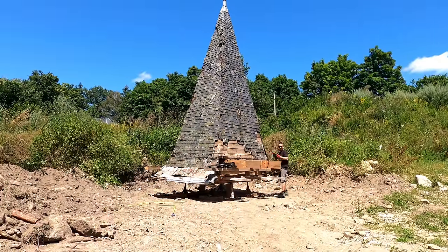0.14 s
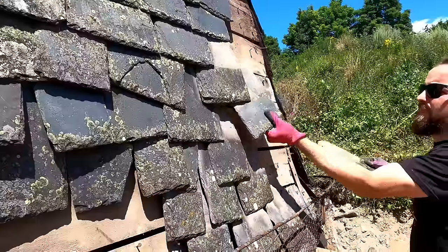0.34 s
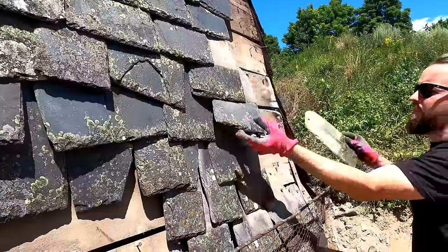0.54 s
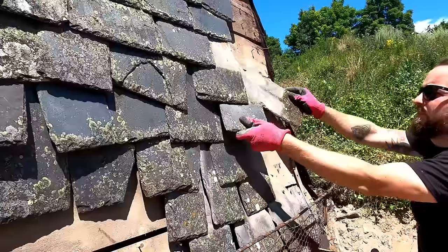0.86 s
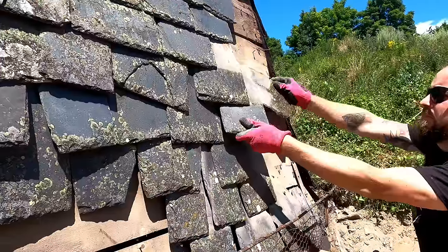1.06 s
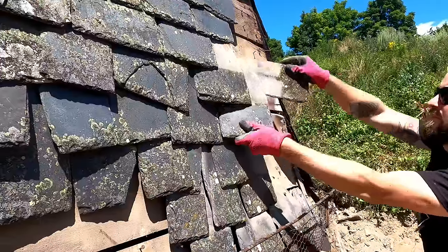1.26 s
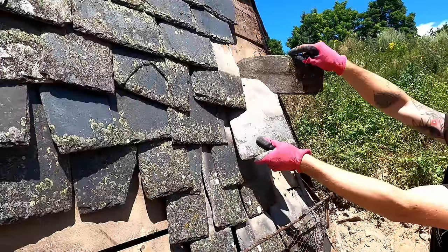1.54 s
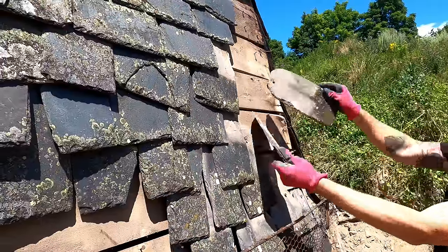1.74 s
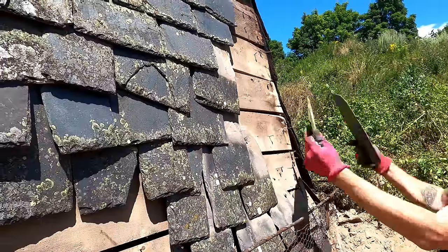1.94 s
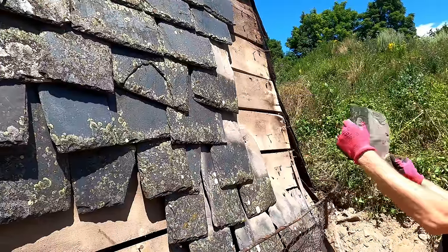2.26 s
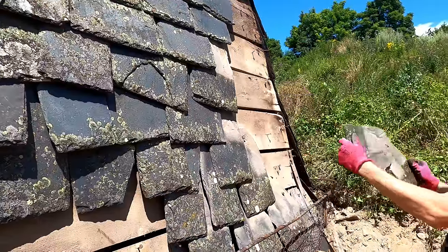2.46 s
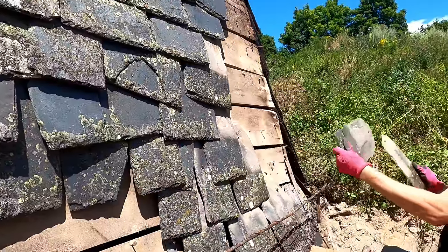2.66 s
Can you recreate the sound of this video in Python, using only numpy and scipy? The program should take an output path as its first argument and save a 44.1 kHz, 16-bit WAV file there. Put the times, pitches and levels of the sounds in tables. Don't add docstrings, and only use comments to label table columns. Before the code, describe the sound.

Roof slates are pulled off wooden boarding by hand: a hard gritty scrape, scattered knocks with dull woody thumps, denser grinding, then two loose slates clink. Close stereo microphone outdoors, with faint low wind rumble.

```python
import sys
import numpy as np
from scipy import signal
from scipy.fft import rfft, irfft, next_fast_len
from scipy.io import wavfile
from scipy.ndimage import map_coordinates

SR = 44100
rng = np.random.default_rng(int(sys.argv[2]) if len(sys.argv) > 2 else 0)


def generate_wav(sig):
    pcm = np.round(np.clip(np.atleast_2d(sig).T, -1, 1) * 32767).astype(np.int16)
    wavfile.write(sys.argv[1], SR, pcm)


def level_to_linear(level):
    exponent = np.asarray(level, float) / 20
    return 10 ** exponent


N = 123480
CLOSE_SHOT_S, IN_HANDS_S = .2205, 1.8

# frequency in Hz, level in dB per Hz.
GRIT_COLOUR = [(180, -38.5), (300, 8), (391, 3.5), (1300, 5.5), (4720, -6), (11700, -39), (15500, -54)]
# frequency in Hz, width in Hz, level in dB.
FIRST_SLATE = [(904, 80, -4), (1290, 90, -4), (1750, 60, -4), (2240, 110, -5), (2490, 70, -7),
               (2850, 60, -8), (3590, 55, -7), (4480, 70, -10), (4980, 70, -10), (6050, 70, -18),
               (9920, 200, -37)]
# frequency in Hz, level in dB, t60 in s.
THIN_MODES = [(470, -21, .1), (856, -14, .09), (1098, -16, .14), (1303, -3, .11), (1895, -8, .14),
              (2250, -5, .14), (2738, -7, .07), (2998, 0, .12), (3984, -4, .048), (4360, -11, .06),
              (5502, -12, .06), (5728, -5, .049), (7488, -14, .06)]
# frequency in Hz, level in dB, t60 in s.
THICK_MODES = [(856, -13, .1), (1303, -1, .11), (1405, -4, .09), (1744, -9, .09), (2218, 4, .05),
               (3343, 0, .055), (3989, -14, .06), (4506, -12, .05), (5146, -18, .05), (5932, -18, .06)]


def unit(x):
    return x / np.sqrt(np.mean(x ** 2) + 1e-20)


def along(points, hz):
    f, v = np.transpose(points)
    return np.interp(np.log(hz + 1), np.log(f + 1), v)


def curves(rows, outside=None):
    s, *cols = np.transpose(rows)
    return [np.interp(np.arange(N) / SR, s, c, outside, outside) for c in cols]


def wobble(rate):
    return map_coordinates(rng.standard_normal(int(N * rate / SR) + 4), [np.arange(N) * rate / SR])


def filtered(x, response):
    m = 2 * next_fast_len(N // 2 + SR // 4)
    return irfft(rfft(x, m) * response(np.fft.rfftfreq(m, 1 / SR)), m)[..., :N]


def causal(gain):
    cepstrum = irfft(np.log(gain / np.sqrt(np.mean(gain ** 2)) + 1e-6))
    half = len(cepstrum) // 2
    folded = np.r_[cepstrum[0], 2 * cepstrum[1:half], cepstrum[half]]
    return np.exp(rfft(folded, len(cepstrum)))


def resonance(f, centre, width):
    return 1j * f * width / (centre * centre - f * f + 1j * f * width)


def slate(spectrum, peaks, ring_db):
    def response(f):
        lift = 0
        for centre, width, db in peaks:
            height = level_to_linear(ring_db + db - along(spectrum, centre))
            lift = lift + height / (1 + (2 * (f - centre) / width) ** 2)
        return causal(level_to_linear(along(spectrum, f)) * (1 + lift))
    return response


def damped_notes(rows):
    out, t = np.zeros(N + SR), np.arange(SR // 4) / SR
    for s, db, hz, t60 in rows:
        rise_s = min(.025 * t60, .0023)
        envelope = level_to_linear(db - 60 * t / t60) * (1 - np.exp(-t / rise_s))
        out[round(s * SR):][:len(t)] += envelope * np.sin(2 * np.pi * hz * t)
    return out[:N]


def grit():
    grains_per_s, spread_db, mean_t60, on_mode_share = 4500, 3.5, .03, .3
    draw = rng.random((int(grains_per_s * N / SR), 4))
    start, pitch, rarity, damping = np.split(draw, 4, axis=1)
    k = np.arange(360)
    size = np.minimum(level_to_linear(-spread_db * np.log(rarity)), 3)
    mode = np.array(FIRST_SLATE)[(pitch * 9973).astype(int) % len(FIRST_SLATE), 0]
    hz = np.where(pitch % .01 < .01 * on_mode_share, mode, 600 + 16000 * pitch)
    decay = np.cos(k * np.pi / 720) * level_to_linear(-60 * k / SR / (mean_t60 * (.4 + damping)))
    chips = size * decay * np.sin(2 * np.pi * hz * k / SR)
    rung = np.bincount(((start * N).astype(int) + k).ravel(), chips.ravel())[:N]
    judder = level_to_linear(.9 * wobble(44.46))
    return unit((rng.standard_normal(N) + unit(rung)) * judder)


def drags():
    # time in s, pressure in dB.
    strokes = [
        [(.3, -47.5), (.34, -40.5), (.39, -36)],
        [(.404, -15), (.42, -32), (.475, -24.5), (.495, -24), (.565, -21.5), (.62, -26), (.652, -34),
         (.696, -51.5)],
        [(.695, -36), (.706, -34.5), (.77, -28), (.816, -49.5)],
        [(1.27, -34), (1.31, -20), (1.375, -26.5), (1.42, -32), (1.48, -28.5)],
        [(1.48, -23.5), (1.52, -30.5), (1.575, -20), (1.61, -24), (1.635, -24), (1.67, -32.5), (1.69, -24),
         (1.74, -34), (1.78, -60)],
    ]
    bright_db = [-19, -5.5, -2, -2.5, 8.5]
    force, grains = np.zeros(N), grit()
    begin, end = round(CLOSE_SHOT_S * SR), round(IN_HANDS_S * SR)
    force[begin:end] = level_to_linear(-56) * rng.standard_normal(end - begin)
    bright = 2 * force
    for stroke, lift_db in zip(strokes, bright_db):
        db, = curves(stroke, outside=-120)
        force += level_to_linear(db) * grains
        bright += level_to_linear(db) * (level_to_linear(lift_db) - 1) * grains
    return force, bright


def knocks():
    # start in s, peak in dB, pitch in Hz, t60 in s.
    blows = [(0.2197, -21, 2010, 0.075), (0.239, -22.5, 2010, 0.13), (0.275, -15.5, 1753, 0.13),
             (0.394, -6.5, 1006, 0.056), (0.479, -18, 1310, 0.17), (0.814, -25.5, 1515, 0.19),
             (0.872, -31.5, 996, 0.052), (0.891, -9.5, 1004, 0.21), (0.943, -19, 1550, 0.097),
             (0.994, -42, 3080, 0.29), (1.038, -13.5, 4540, 0.098), (1.059, -12.5, 1225, 0.15),
             (1.117, -33, 1340, 0.13), (1.253, -12, 973, 0.21), (1.295, -22.5, 820, 0.66),
             (1.393, -12, 1620, 0.08), (1.485, -11, 1284, 0.074), (1.497, -15, 1300, 0.24),
             (1.575, -9, 2200, 0.019), (1.618, -12, 2420, 0.061), (1.63, -2.5, 1390, 0.027),
             (1.646, -17.5, 2620, 0.11), (1.677, -12, 1530, 0.071), (1.704, -23, 3000, 0.1),
             (1.728, -19.5, 4030, 0.15), (1.786, -15, 2233, 0.15)]
    force, pings, t = np.zeros(N + SR), np.zeros(N + SR), np.arange(SR // 4) / SR
    f = np.fft.rfftfreq(len(t), 1 / SR)
    for s, db, hz, t60 in blows:
        envelope = level_to_linear(db - 16 - 60 * t / t60) * (1 - np.exp(-t / .00098))
        burst = envelope * rng.standard_normal(len(t))
        bloom = 3.5 + level_to_linear(7) * resonance(f, hz, .5 * hz)
        levelling = level_to_linear(-.6 * along(GRIT_COLOUR, hz))
        colour = bloom * levelling / (1 + 1j * f / 9600) ** 2
        force[round(s * SR):][:len(t)] += irfft(rfft(burst) * colour, len(t))
        pings[round(s * SR):][:len(t)] += level_to_linear(db - 7 - 120 * t / t60) * np.sin(2 * np.pi * hz * t)
    return force[:N], pings[:N]


def boards(force):
    # frequency in Hz, width in Hz, level in dB.
    board_modes = [(204.6, 39.3, 6.5), (302, 58, -8), (151, 33, 1.5)]

    def wood(f):
        return sum(level_to_linear(db) * resonance(f, c, w) for c, w, db in board_modes) / (1 + 1j * f / 500)
    return level_to_linear(7) * filtered(force, wood)


def thumps():
    # start in s, peak in dB, frequency in Hz, t60 in s.
    booms = [(0.276, -30, 230, 0.1), (0.396, -21, 198, .07), (0.891, -13.5, 202, 0.098),
             (1.041, -22, 212, .1), (1.062, -23.5, 239.5, 0.22), (1.125, -30, 197, 0.098),
             (1.188, -28, 264, 0.052), (1.254, -26, 283, 0.17), (1.268, -16, 216, 0.097),
             (1.305, -34, 125, 0.059), (1.789, -17.5, 222, 0.073), (2.129, -36.5, 167, 0.077),
             (2.499, -30.5, 195, 0.032)]
    return damped_notes(booms)


def roof():
    # frequency in Hz, width in Hz, level in dB.
    second_slate = [(1337, 140, -11), (1670, 38, -5.5), (2200, 60, 3), (2490, 38, 1), (3000, 97, -3),
                    (3400, 80, 0), (3830, 56, -7.5), (4830, 24, -26), (5900, 60, -28), (9450, 57, -59)]
    swap_s, swap_fade_s, ring_db, bright_edge_hz = 1.47, .03, 4, 2800
    drag_force, bright = drags()
    knock_force, pings = knocks()
    force = drag_force + knock_force
    drive = force + filtered(bright, lambda f: (1j * f / (bright_edge_hz + 1j * f)) ** 2)
    later = np.clip((np.arange(N) / SR - swap_s) / swap_fade_s, 0, 1)
    first = filtered((1 - later) * drive, slate(GRIT_COLOUR, FIRST_SLATE, ring_db))
    second = filtered(later * drive, slate(GRIT_COLOUR, second_slate, ring_db))
    return first + second + boards(force) + pings + thumps()


def taps():
    # start in s, peak in dB, frequency in Hz, t60 in s.
    ticks = [(.2205, -46, 11000, 0.0014), (.2215, -27, 3600, 0.034), (.3265, -36, 7500, 0.0023),
             (.399, -33, 7200, 0.046), (.472, -14, 3600, 0.043), (.894, -36.5, 5750, 0.23),
             (.9, -16.5, 3050, 0.05), (.943, -28.5, 3360, 0.1), (.944, -28, 3850, 0.094),
             (1.06, -21, 2800, 0.098), (1.119, -47, 5740, 0.071), (1.178, -41, 3200, 0.0054),
             (1.192, -37, 3000, 0.0045), (1.2375, -36, 3200, 0.012), (1.2965, -8, 1500, 0.0089),
             (1.456, -34, 8000, 0.0099), (1.4845, -11, 3300, 0.012), (1.497, -5.5, 3100, 0.0067),
             (1.576, -9.5, 3400, 0.012), (1.617, -16.5, 4830, 0.072), (1.63, -18.5, 3830, 0.13),
             (1.649, -10, 2950, 0.045), (1.706, -16, 3000, 0.073), (1.728, -12.5, 3900, 0.056),
             (1.868, -46, 3360, .08), (1.961, -40.5, 3350, 0.074), (2.042, -52, 3900, 0.079),
             (2.068, -43.5, 6050, .006), (2.1285, -30, 10300, 0.0046), (2.202, -43, 3980, 0.097),
             (2.29, -50, 8000, .004), (2.4984, -6, 2280, 0.021), (2.4984, -5, 3480, 0.0069),
             (2.569, -33, 2390, 0.075)]
    return damped_notes(ticks)


def struck_modes(modes, t):
    return sum(level_to_linear(db + rng.normal(0, 1) - 60 * t / t60) * np.sin(2 * np.pi * hz * t) for hz, db, t60 in modes)


def clinks():
    # start in s, peak in dB, share of the thicker slate from 0 to 1, crack in dB.
    touches = [
        (1.867, -38, 0.8, 6),
        (2.128, -8.5, 0, -2),
        (2.4784, -41, 0.68, -0.5),
        (2.4878, -27.5, 0.7, -10.5),
        (2.4983, -8.5, 0.97, -2),
        (2.5684, -19.5, 0.53, -5),
    ]
    # frequency in Hz, level in dB.
    crack_colour = [(100, -44), (300, -4.5), (1200, -14), (2200, 17.5), (3600, 0), (6500, -7), (9000, -26),
                    (12000, -74)]
    crack_t60 = .016
    ring, crack, t = np.zeros(N + SR), np.zeros(N + SR), np.arange(SR // 3) / SR
    for s, db, share, crack_db in touches:
        both = (1 - share) * struck_modes(THIN_MODES, t) + share * struck_modes(THICK_MODES, t)
        ring[round(s * SR):][:len(t)] += level_to_linear(db - 9) * both * (1 - np.exp(-t / .0013))
        crack[round(s * SR):][:len(t)] += level_to_linear(db + crack_db - 60 * t / crack_t60) * rng.standard_normal(len(t))
    return ring[:N] + filtered(crack[:N], lambda f: causal(level_to_linear(along(crack_colour, f))))


def handling():
    # time in s, pressure in dB.
    pressure = [(1.8, -74), (1.93, -51), (1.99, -46.5), (2.1, -57), (2.127, -42), (2.25, -52),
                (2.46, -62.5), (2.6, -48.5), (2.7, -56.5), (2.8, -54.5)]
    # frequency in Hz, level in dB per Hz.
    rub_colour = [(200, -3.5), (700, -10.5), (1400, 0), (3400, -1), (7000, -15), (15500, -36.5)]
    db, = curves(pressure, outside=-120)
    peaks = [(hz, 5 / t60, level - 4) for hz, level, t60 in THIN_MODES + THICK_MODES]
    return level_to_linear(db - 7.5) * filtered(grit() + rng.standard_normal(N), slate(rub_colour, peaks, 0))


def squeak():
    # time in s, frequency in Hz, level in dB.
    tone = [
        (2.68, 459, -55),
        (2.715, 483, -47),
        (2.745, 436, -53),
        (2.78, 450, -64),
        (2.8, 464, -47),
    ]
    # time in s, level in dB.
    overtone = [
        (2.73, -65),
        (2.755, -53.5),
        (2.785, -68),
    ]
    hz, tone_db = curves(tone)
    overtone_db, = curves(overtone)
    phase = 2 * np.pi * np.cumsum(hz * (1 + .0234 * wobble(90))) / SR
    on = np.arange(N) > tone[0][0] * SR
    fundamental = level_to_linear(tone_db + 3 * wobble(40)) * np.sin(phase)
    return on * (fundamental + level_to_linear(overtone_db) * np.sin(2.08 * phase))


def placed(x, lean_db):
    # frequency in Hz, likeness from 0 to 1.
    alike = [(250, .998), (2500, .96), (5500, .85), (9000, .55)]
    # frequency in Hz, level difference in dB.
    shading = [(100, .3), (2500, .3), (5000, -1.5), (10000, -3.3)]
    lag_s, side = 3.9e-5, np.array([[1], [-1]])
    smear = rng.standard_normal(900) * np.exp(-np.arange(900) / 250)
    other = signal.fftconvolve(x, smear / np.linalg.norm(smear))[:N] * unit(wobble(50))

    def turn(f):
        return np.arccos(np.clip(along(alike, f), 0, 1)) / 2

    def port(f):
        delay = np.exp(-1j * np.pi * f * lag_s * side / (1 + (f / 8000) ** 2))
        return level_to_linear(side * (along(shading, f) + lean_db) / 2) * delay
    common = filtered(x, lambda f: port(f) * np.cos(turn(f)))
    return common + filtered(other, lambda f: side * port(f) * np.sin(turn(f)))


def yard(x):
    # frequency in Hz, t60 in s.
    decay = [(200, .15), (10000, .08)]
    hz, t, z = signal.stft(rng.standard_normal((2, SR // 3)), SR, nperseg=256)
    tail = signal.istft(z * level_to_linear(-60 * t / along(decay, hz)[:, None]), SR, nperseg=256)[1]
    late = np.pad(x, (150, 0))[None]
    return level_to_linear(-19) * signal.fftconvolve(late, tail / np.linalg.norm(tail[0]), axes=1)[:, :N]


def wind():
    # time in s, level in dB.
    strength = [(0, -42), (.21, -45.5), (.23, -48), (1, -51), (1.3, -48), (2, -53), (2.15, -64.5),
                (2.35, -55), (2.8, -58)]
    # frequency in Hz, level in dB per Hz.
    rumble_colour = [(20, -4), (47, -2.5), (120, -8), (180, -10.5), (280, -25.5), (600, -38), (1100, -120)]
    db, = curves(strength)
    shared, apart = rng.standard_normal((2, N))
    apart = filtered(apart, lambda f: 1.3 / (1 + (f / 95) ** 6))
    turn = np.arccos(.8) / 2
    ports = np.array([np.cos(turn) * shared + np.sin(turn) * apart, np.cos(turn) * shared - np.sin(turn) * apart])
    gusts = level_to_linear(1.34 * wobble(8.78))
    rumble = unit(filtered(ports, lambda f: level_to_linear(along(rumble_colour, f))) * gusts)
    return level_to_linear(db + 8.5) * rumble * level_to_linear([[.7], [-.7]])


def hush():
    # frequency in Hz, level in dB.
    air_colour = [(60, -30), (150, 3), (300, -5.5), (500, -29), (1200, -21.5), (12000, -58)]
    middle, side = rng.standard_normal((2, N))
    ports = np.array([middle + .067 * side, middle - .067 * side])
    air = unit(filtered(ports, lambda f: level_to_linear(along(air_colour, f))))
    return level_to_linear(-53.5) * air * (np.arange(N) < CLOSE_SHOT_S * SR)


def scene():
    on_roof = np.arange(N) < IN_HANDS_S * SR
    ticks = taps()
    work = roof() + on_roof * ticks
    loose = clinks() + handling() + squeak() + ~on_roof * ticks
    return placed(work, 0) + placed(loose, -2.5) + yard(work + loose) + wind() + hush()


def roll_off(x):
    return signal.sosfilt(signal.butter(12, 15780, fs=SR, output="sos"), x)


def record(dry):
    return roll_off(dry)


dry = scene()
out = record(dry)
generate_wav(out)
```